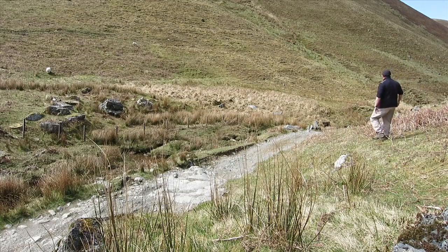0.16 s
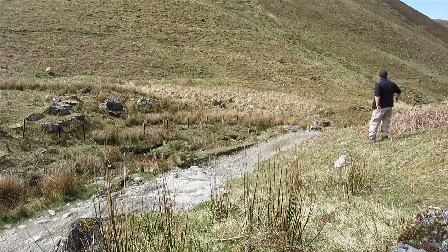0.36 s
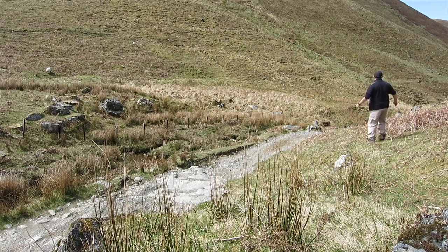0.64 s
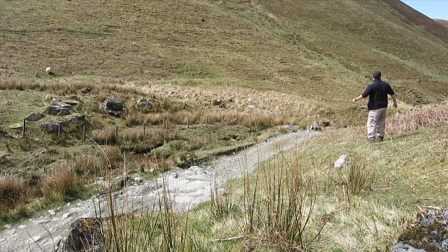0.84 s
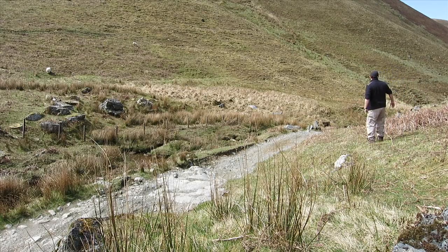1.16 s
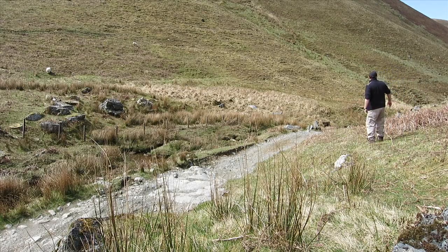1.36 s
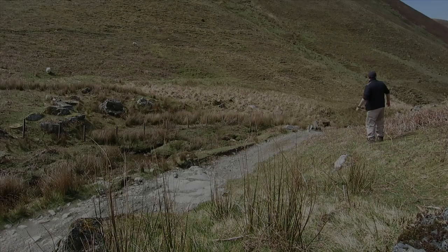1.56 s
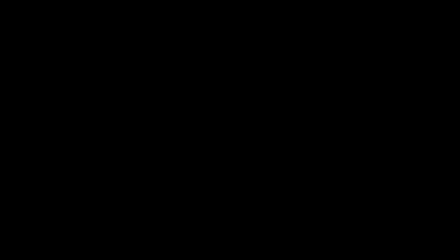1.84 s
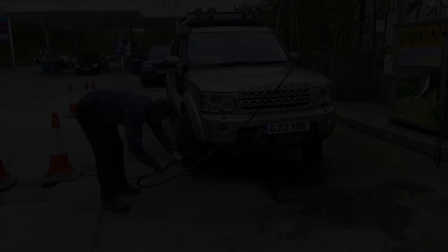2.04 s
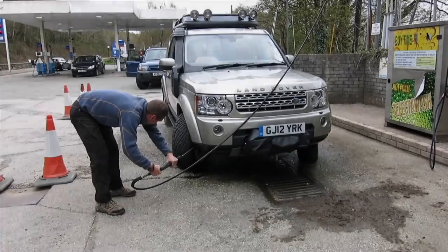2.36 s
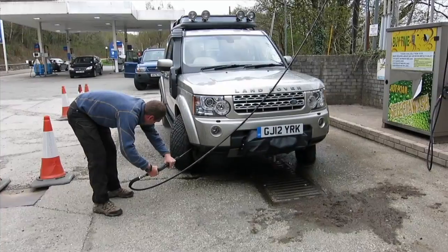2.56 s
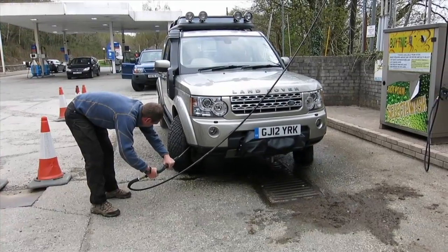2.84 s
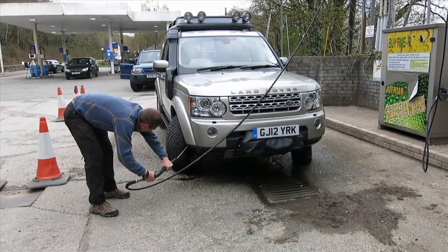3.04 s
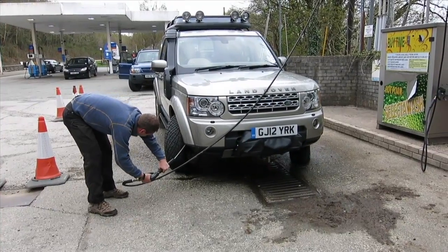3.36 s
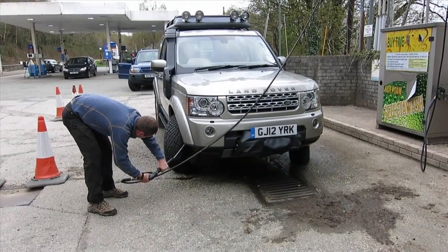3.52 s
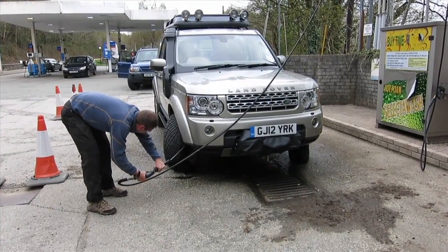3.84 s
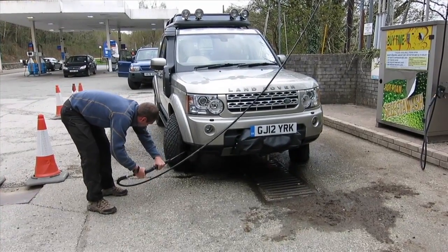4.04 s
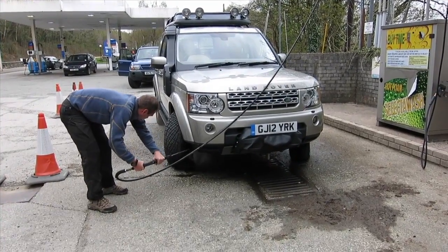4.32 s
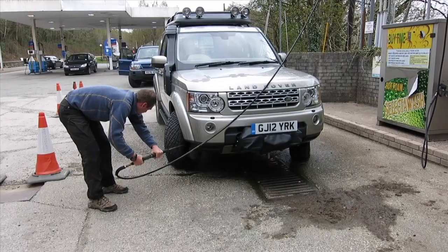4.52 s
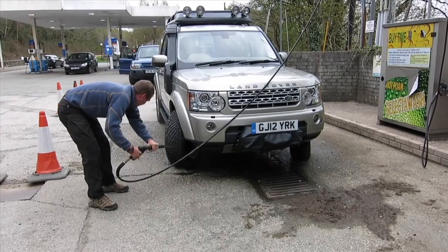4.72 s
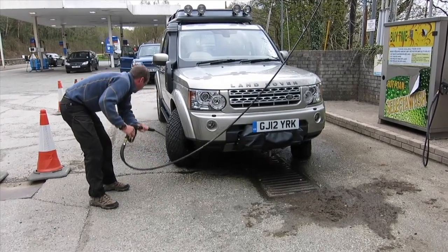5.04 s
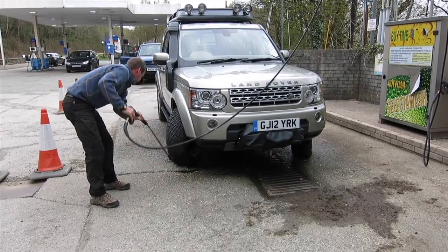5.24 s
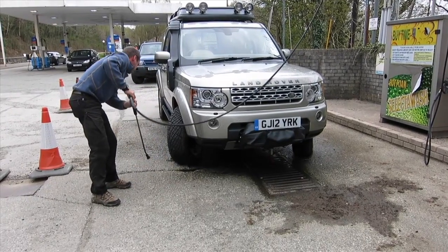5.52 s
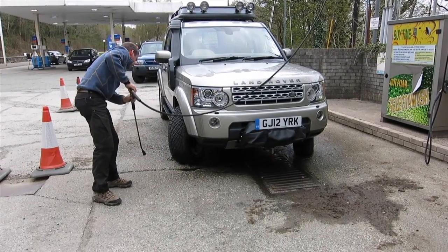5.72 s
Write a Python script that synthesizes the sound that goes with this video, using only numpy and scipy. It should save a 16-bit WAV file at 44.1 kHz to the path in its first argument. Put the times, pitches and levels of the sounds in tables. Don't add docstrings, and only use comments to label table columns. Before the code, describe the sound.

Gusty wind and crisp grass rustle, an abrupt cut to loud hissing water spray, then a humming, squeaking, knocking pump and fine drips.

```python
import sys
import numpy as np
from scipy import signal
from scipy.fft import rfft, irfft, next_fast_len
from scipy.io import wavfile
from scipy.ndimage import uniform_filter1d

SR = 44100
rng = np.random.default_rng(int(sys.argv[2]) if len(sys.argv) > 2 else 0)


def to_linear_factor(level_db):
    exponent = np.asarray(level_db, float) / 20
    return 10 ** exponent


def inscribe(sig):
    pcm = np.round(np.clip(np.atleast_2d(sig).T, -1, 1) * 32767)
    wavfile.write(sys.argv[1], SR, pcm.astype(np.int16))


N = 259749
T = np.arange(N) / SR
SHUT = 4.655


def evened(x):
    return x / np.sqrt(np.mean(x ** 2) + 1e-20)


def read(points, hz):
    f, value = np.transpose(points)
    return np.interp(np.log(hz + 1), np.log(f + 1), value)


def columns(rows):
    s, *rest = np.transpose(rows)
    return [np.interp(T, s, c) for c in rest]


def swells(rows, t, rise, fall, rest_db):
    start, hold, db = np.transpose(rows)[:, :, None]
    rising = rise * np.maximum(start - t, 0)
    falling = fall * np.maximum(t - start - hold, 0)
    each = db - rising - falling
    return np.maximum(each.max(0), rest_db)


def add(mix, s, sound, lean_db, sense=1):
    part = mix[:, max(round(s * SR), 0):][:, :len(sound)]
    lean = to_linear_factor(np.minimum([[lean_db], [-lean_db]], 0))
    part += sound[:part.shape[1]] * lean * [[1], [sense]]


def resonate(x, hz, width):
    turn = np.exp(2j * np.pi * np.cumsum(hz * np.ones(N)) / SR)
    r = np.exp(-np.pi * width / SR)
    return 2 * (turn * signal.lfilter([1 - r], [1, -r], x / turn)).real


def noise(shape, lean, patchy_db, flicker_db, lifts=()):
    # f/Hz, likeness 0-1
    likeness = [(200, 1), (700, 0.97), (1400, 0.91), (2800, 0.94), (3900, 0.97), (6000, 0.99), (10600, 1),
                (11600, 0.83), (13000, 0.74), (15000, 0.8)]
    frames, hz = N // 256 + 5, np.fft.rfftfreq(512, 1 / SR)
    a, b, c, d, patches = rng.standard_normal((frames, 257, 5)).T
    patches = uniform_filter1d(patches, size=6, axis=0)
    patches = evened(uniform_filter1d(patches, size=12, axis=1))
    flicker = evened(uniform_filter1d(rng.standard_normal(frames), size=2))
    apart = np.sqrt(1 - np.clip(read(likeness, hz), -1, 1)[:, None] ** 2) * to_linear_factor(4 * patches[::-1, ::-1])
    apart = np.minimum(apart, 1)
    left = a + 1j * b
    right = np.sqrt(1 - apart ** 2) * left + apart * (c + 1j * d)
    z = np.array([left, right]) * to_linear_factor(patchy_db * patches + flicker_db * flicker)
    x = signal.istft(z, window="cosine", nperseg=512, noverlap=256)[1]
    size = next_fast_len(N)
    fine = np.fft.rfftfreq(size, 1 / SR)
    db = read(shape, fine) + sum(lift / (1 + (2 * (fine - f) / w) ** 2) for f, w, lift in lifts)
    lean_db = read(lean, fine) / 2 * np.array([[1], [-1]])
    x = irfft(rfft(x, size) * to_linear_factor(db + lean_db), size)[:, :N]
    return x / np.sqrt(np.mean(x.mean(0) ** 2))


def hits(rows, t60, spread, trim_db, scatter=1, rise=0.00038):
    out, t = np.zeros((2, N)), np.arange(2500) / SR
    end_fade = signal.windows.tukey(5000, .4)[2500:]
    for (s, db, hz, lean_db), (off, phase) in zip(rows, rng.random((len(rows), 2, 12, 1))):
        partial_hz = hz * np.exp(spread * (2 * off - 1))
        partial_hz = 15000 - abs(15000 - partial_hz)
        partials = np.sin(2 * np.pi * (partial_hz * t + scatter * phase)).sum(0)
        decay = to_linear_factor(db + trim_db - 60 * t / t60)
        hit = partials / np.sqrt(12) * decay * np.minimum(t / rise, 1)
        add(out, s, hit * end_fade, lean_db)
    return out


def tones(lines, waver_db):
    drift = uniform_filter1d(rng.standard_normal((len(lines), N // 100 + 2)), size=30)
    total = 0
    for (hz, db), d in zip(lines, drift):
        waver = np.interp(T * SR / 100, np.arange(len(d)), evened(d))
        total = total + to_linear_factor(db + waver_db * waver) * np.sin(2 * np.pi * (hz * T + rng.random()))
    return evened(total)


def eddy(hz, turns, phase, edge):
    u = np.arange(-700, 700) / SR * hz
    swing = np.cos(2 * np.pi * u + phase) * np.exp(-(u / turns) ** 2)
    core = np.cos(2 * np.pi * 1.97 * u + phase) * np.exp(-(u / 0.3) ** 2)
    return ((1 - edge) * swing + edge * core) * signal.windows.hann(1400)


def wind(spread_db=4.5):
    # start t/s, hold/s, strength level/dB
    squalls = [(0.0, 0.11, -38.5), (.16, 0.074, -50), (.47, 0.097, -34), (.58, 0.18, -27),
               (.96, 0.091, -28.5), (1.085, 0.043, -19), (1.21, 0.042, -38.5), (1.33, 0.04, -31),
               (1.5, 0.11, -43), (1.76, 0.027, -40.5), (1.89, 0.032, -32.5), (2.17, 0.13, -25.5),
               (2.38, 0.19, -49), (2.8, 0.045, -23), (3.07, 0.12, -29), (3.2, 0.084, -23.5),
               (3.32, 0.18, -37), (3.55, 0.25, -49), (5.82, .1, -42)]
    # t/s, peak level/dB, f/Hz, left over right/dB
    hill_gusts = [(0.0129, -18, 119, -1.5), (0.072, -17, 187, 2.5), (0.216, -32, 140, 4.0),
                  (0.47, -20.5, 134, 1), (0.5962, -7, 213, -1.5), (0.637, -4.5, 193, -11),
                  (0.653, -6, 107, -6), (0.67, -3.5, 236, 1), (0.736, -3, 204, 0.5),
                  (0.7445, -11.5, 290, 3), (0.8873, -14, 169.3, 2.3), (0.9185, -13.5, 220.4, 3.5),
                  (0.928, -9, 155, 2.5), (1.0072, -2, 208, 2), (1.057, -11, 266, 3),
                  (1.0954, -1.5, 366, 30), (1.101, -11, 510, 7), (1.105, -2, 343, 9),
                  (1.111, -10.5, 291, 6), (1.246, -20, 100, 1), (1.334, -9, 196, -2.5),
                  (1.3745, -15, 197, 2.3), (1.5018, -18, 136, 3), (1.551, -18, 173, -2),
                  (1.579, -18.5, 168, -3.5), (1.763, -21, 109, 1), (1.8125, -22.5, 193, 7),
                  (1.8794, -17.5, 233, 5), (1.899, -32, 170, 7), (1.992, -16.5, 130, 1.4)]
    # t/s, peak level/dB, f/Hz, left over right/dB
    bay_gusts = [(2.305, -13, 170, -6), (2.333, -13, 168, 6), (2.798, -12, 201, 20), (2.812, -6, 201, -8),
                 (3.1743, -5, 240, 6), (3.2054, -8, 149, 0), (3.2656, -4.5, 172, 1.5), (3.4165, 0, 245, -2),
                 (3.442, -13, 170, 0), (3.701, -23.5, 89.5, -7), (5.818, -30, 95, -8)]
    out = np.zeros((2, N))
    at = np.arange(0, N / SR, 1 / 190)
    squall_db = swells(squalls, at, rise=270, fall=400, rest_db=-62)
    draws = np.c_[rng.random((len(at), 2)), rng.standard_normal((len(at), 3))]
    for t, strength, (u, v, size, pace, lean) in zip(at, squall_db, draws):
        hz = (165 + 1.4 * (strength + 35)) * np.exp(0.36 * pace)
        swirl = to_linear_factor(strength + 2.0 + spread_db * size) * eddy(hz, 1.0, 2 * np.pi * v, 0.19)
        add(out, t + u * 0.00436 - 700 / SR, swirl, 5.3 * lean, -1)
    for t, peak_db, hz, lean_db in hill_gusts + bay_gusts:
        gust = to_linear_factor(peak_db) * rng.choice([-1, 1]) * eddy(hz, 0.49, 0.12, 0.11)
        add(out, t - 700 / SR, gust, lean_db, -1)
    return out


def far_air():
    # f/Hz, level/dB per Hz
    common = [(40, -20), (100, 0.5), (250, 2), (600, -6.5), (1200, -12), (2600, -17.5), (3600, -25),
              (8000, -30.5), (15500, -41)]
    # f/Hz, level/dB per Hz
    opposed = [(40, -16), (120, 3), (300, -4), (700, -9), (1500, -15.5), (2800, -28.5), (4500, -39),
               (15500, -45)]
    flat, fade_db = [(100, 0), (200, 0)], -3.5 * T
    mid = to_linear_factor(-59.5 + fade_db) * noise(common, flat, 2.6, 0.58)[0]
    side = to_linear_factor(-55 + fade_db) * noise(opposed, flat, 1.5, .6)[0]
    return mid + side * [[1], [-1]]


def grass():
    # f/Hz, level/dB per Hz
    stalks = [(3000, -34), (5500, -11), (8000, -9), (12000, -4.5), (14500, -13), (16000, -20)]
    # start t/s, hold/s, level/dB
    slides = [
        (0.0, .05, -78),
        (.132, .008, -66),
        (.19, .015, -63),
        (.255, 0.044, -53.5),
        (.53, 0.021, -67),
        (.572, .02, -71),
        (.81, 0.08, -72),
    ]
    # t/s, peak level/dB, f/Hz, left over right/dB
    snaps = [(0.0243, -42, 10200, 6), (0.1286, -48, 13500, 8), (.133, -48, 8200, 4),
             (0.17, -55, 11500, 5.0), (0.189, -40, 11600, 6), (0.2109, -39, 11800, 7),
             (0.2483, -44, 11900, 2.5), (0.2563, -40, 12200, 2.0), (0.2698, -37, 11800, 7),
             (0.2952, -33, 12000, 5), (.296, -38, 7500, 8), (.311, -46, 10000, 4),
             (0.4469, -50, 11200, 3.0), (0.5312, -35, 11300, 5.0), (.538, -50, 10000, 5),
             (0.5656, -39, 11900, 7.5), (0.7946, -53, 8720, 2.0), (0.851, -38, 7200, 3),
             (0.8919, -56, 6120, 18), (1.0515, -60, 6600, -0.5)]
    slide_db = swells(slides, T, rise=830, fall=440, rest_db=-81 - 9 * T)
    slide = to_linear_factor(slide_db) * noise(stalks, [(100, 3), (200, 5.5)], 2.5, 6.4)
    return slide + hits(snaps, 0.01, 0.3, -2.0)


def port_cracks():
    # t/s, peak level/dB, f/Hz, left over right/dB
    jolts = [
        (.851, -59, 3770, 1),
        (1.005, -55, 2800, 2),
        (1.093, -43, 3260, 14),
        (1.094, -48, 1680, 16),
        (1.65, -64, 4510, 0),
    ]
    return hits(jolts, 0.013, 0.19, 0)


def hillside():
    return far_air() + grass() + port_cracks()


def gain_drop():
    # t/s, drop level/dB
    trips = [
        (2.193, 2.5),
        (2.814, 5),
        (3.21, 4.5),
        (3.416, 7),
    ]
    total_db = 0
    for s, db in trips:
        fall = np.clip((T - s) / 0.0077 + .5, 0, 1)
        recovery = np.exp(-np.maximum(T - s, 0) / 0.54)
        total_db = total_db - db * fall * recovery
    return total_db


def arch_roar(lean, rims):
    # f/Hz, level/dB per Hz
    roaring = [(250, -35), (400, -8), (520, 0.5), (700, -0.5), (850, -1), (1100, -5.5), (1400, -9.5),
               (2500, -66)]
    # t/s, f/Hz, ringing 0-1
    hollows = [(2, 670, 0.55), (2.6, 700, 0.35), (3.1, 700, 0.03), (3.4, 644, 0), (3.5, 840, 0.7),
               (3.61, 830, 0.57), (3.68, 940, 0.96), (3.76, 895, 0.75), (3.83, 950, 0.3), (3.92, 800, 0.4),
               (4.05, 810, .5), (4.65, 766, 1)]
    roar = noise(roaring, lean, 1.02, 1.0, rims)
    hollow_hz, ringing = columns(hollows)
    hollow = evened(resonate(roar, hollow_hz, 117))
    return np.sqrt(1 - np.clip(ringing, 0, .95) ** 2) * roar + ringing * hollow


def lance(hiss_db, splash_db, roar_db, tread_db):
    # f/Hz, level/dB per Hz
    hissing = [(2240, -26), (3800, -7), (4230, -8.5), (5520, -5.5), (6110, -6), (6730, -4.5), (7920, 0),
               (9370, -1.5), (12500, -2), (14600, -4.5), (16000, -17.5)]
    # f/Hz, level/dB per Hz
    splashing = [(1300, -22), (1900, 1), (2400, -1), (3100, 0.5), (3650, -2), (3950, -8), (4600, -9.5),
                 (5500, -7.5), (7000, -20)]
    # f/Hz, level/dB per Hz
    treading = [(700, -78), (1000, -6.5), (1200, -2), (1500, 3.5), (1900, -6), (2300, -31), (3200, -48)]
    # f/Hz, level/dB per Hz
    underside = [(50, -62), (110, -21), (200, 0.5), (330, 0.5), (460, 2.5), (650, -44), (1200, -60)]
    # t/s, level over hiss/dB
    drumming = [
        (2.03, -18.5),
        (2.13, -13),
        (2.7, -13.5),
        (3.3, -16.5),
        (3.7, -21),
        (4.2, -21.5),
        (4.6, -17),
    ]
    # f/Hz, width/Hz, lift/dB
    rims = [(466, 38, 2), (601, 27, 3), (754, 7, 8), (858, 12, 5), (942, 22, 3), (1247, 70, 2.5),
            (1529, 55, 3), (1948, 50, 2.5), (2676, 32, 3.5), (3255, 50, 3), (3478, 70, 2.5),
            (7924, 40, 3.5), (8146, 95, 2.5), (12527, 45, 2.5)]
    # f/Hz, left over right/dB
    jet_lean = [(60, 0), (150, -2), (380, -4.5), (950, -6), (2380, -2.5), (4200, 0), (10000, -1.5),
                (15000, 0)]
    hiss = noise(hissing, jet_lean, 0.99, 0.74, rims)
    splash = to_linear_factor(splash_db) * noise(splashing, jet_lean, 1.34, 0.79, rims)
    tread = to_linear_factor(tread_db) * noise(treading, jet_lean, 1.17, 0.29, rims)
    roar = to_linear_factor(roar_db) * arch_roar(jet_lean, rims)
    drum = to_linear_factor(columns(drumming)[0]) * noise(underside, jet_lean, 2.3, 0.43)
    after = np.maximum(T - SHUT, 0)
    spurt_db = 2.4 * np.exp(-((T - SHUT) / 0.066) ** 2)
    hiss = hiss * to_linear_factor(-1100 * after)
    splash = splash * to_linear_factor(-600 * after + spurt_db)
    low = (tread + roar + drum) * to_linear_factor(-480 * after)
    return to_linear_factor(hiss_db) * (hiss + splash + low)


def pump_hum(level_db):
    # f/Hz, level/dB
    hum_lines = [(102.8, -1.5), (156, -4.5), (210, 2), (231, -4), (314, -6.5)]
    return to_linear_factor(level_db - 5.0) * tones(hum_lines, .5) * to_linear_factor([[-1.7], [1.7]])


def pump_casing(level_db):
    # f/Hz, width/Hz, level/dB
    modes = [(657, 22, 7), (700, 35, 10.5), (800, 47, 10), (876, 15, 11), (1030, 46, -20), (1290, 27, -8),
             (1740, 25, 0.5), (1950, 37, -11), (2600, 30, -14)]
    # f/Hz, level/dB
    whine_lines = [(495.3, -59), (522.2, -56), (597.5, -56.5), (624.5, -54), (699.8, -52.5), (748.3, -53),
                   (802.1, -56), (855.9, -50), (882.9, -45.5), (1012, -57), (1281, -61), (1701, -64),
                   (1740, -62), (1976, -66)]
    strokes = np.diff(np.floor(52.66 * T), prepend=0)
    strokes = strokes * to_linear_factor(0.65 * rng.standard_normal(N))
    drive = 0.29 * evened(strokes) + 0.68 * rng.standard_normal(N) + 0.61 * rng.standard_normal((2, N))
    casing = 0
    for hz, width, db in modes:
        ring = signal.lfilter(*signal.iirpeak(hz, hz / width, SR), drive)
        casing = casing + to_linear_factor(db) * evened(ring)
    whine = to_linear_factor(-3) * tones(whine_lines, 2.6)
    return to_linear_factor(level_db) * (to_linear_factor(-5.5) * evened(casing) + whine) * to_linear_factor([[-3], [3]])


def belt_squeak():
    crank = (6.17 * (T - 4.936)) % 1
    judder = 0.93 + 0.62 * np.cos(2 * np.pi * 6 * crank)
    slip = .08 + np.exp(-(1 - crank) / 0.15) * judder * np.minimum((1 - crank) / 0.019, 1)
    squeak_hz = 4560 + 90 * crank
    tone = np.sin(2 * np.pi * np.cumsum(squeak_hz) / SR)
    rasp = 0.42 * evened(resonate(rng.standard_normal(N), squeak_hz, 60))
    return slip * (tone + rasp)


def yard_wash():
    # f/Hz, level/dB per Hz
    yard = [(40, -32), (90, -17), (160, -6), (240, -7), (372, -13), (873, -13), (1180, -16.5), (1720, -17),
            (2700, -25), (3740, -34), (5500, -32.5), (10000, -38), (14500, -41), (16000, -54)]
    # f/Hz, left over right/dB
    bay_lean = [(60, 4), (150, -4), (380, -5.5), (950, -8), (2380, -7), (4200, -0.5), (10000, 3),
                (15000, 3)]
    return noise(yard, bay_lean, 0.68, 0.92)


def pump_knocks():
    # t/s, peak level/dB, f/Hz, left over right/dB
    knocks = [(4.862, -41, 690, -4), (5.01, -46, 880, -4), (5.163, -44, 875, -5), (5.24, -32, 890, -8),
              (5.279, -45, 860, -5), (5.318, -26.5, 860, -12), (5.47, -38, 860, -9), (5.508, -30, 866, -3),
              (5.544, -24.5, 880, -10), (5.61, -24, 800, -8), (5.709, -21, 953, -4.5),
              (5.7165, -31, 1090, -6), (5.748, -24, 676, -5), (5.778, -27, 880, -8),
              (5.815, -22.5, 800, -5), (5.829, -21, 750, -5), (5.861, -20, 800, -5)]
    # t/s, peak level/dB, f/Hz, left over right/dB
    clinks = [(5.1407, -52, 2440, -3.5), (5.574, -47, 4720, -7), (5.744, -39, 2600, -7),
              (5.762, -46, 2630, -7), (5.776, -35, 2560, -9), (5.792, -45, 2610, -7), (5.81, -48, 2590, -6),
              (5.826, -46, 2600, -6), (5.842, -48, 2600, -6.5), (5.864, -38, 2600, -6),
              (5.874, -41, 4620, -3)]
    return hits(knocks, 0.056, 0.144, -7, 0.3) + hits(clinks, 0.14, 0.0065, -9, .4, 0.0044)


def drips():
    # t/s, peak level/dB, f/Hz, left over right/dB
    pings = [(5.0836, -55, 11400, -1.0), (5.1394, -54, 14400, 1.5), (5.1968, -53, 9240, -0.5),
             (5.411, -53, 10200, -1.0), (5.4388, -52, 9930, 0.0), (5.4637, -50, 14800, 1.0),
             (5.4906, -50, 9140, 0.5), (5.6278, -51, 9570, 1.0), (5.6543, -52, 9740, 0.0),
             (5.8154, -49, 10700, 1.0), (5.8433, -46, 10100, 1.0), (5.8743, -49, 11000, -0.5)]
    at = np.arange(SHUT, N / SR - .02, 1 / 30)
    u, v, w, lean = rng.random((len(at), 4)).T
    peak_db = -71 + 9 * v ** 2 + 7 * (at - SHUT)
    tiny = np.c_[at + .03 * u, peak_db, 9500 + 5500 * np.sqrt(w), 8 * lean - 4]
    return hits(tiny, .035, .012, 0) + hits(pings, .035, .01, -4, 1, .002)


def bay(gain_db):
    # t/s, effort level/dB
    load = [
        (4.74, 1.5),
        (5.05, -3),
        (5.23, -2.5),
        (5.7, 4.5),
        (5.79, 6.5),
        (5.825, 10),
        (5.89, 7),
    ]
    effort_db = columns(load)[0]
    hum = pump_hum(-41 + 0.54 * effort_db)
    casing = pump_casing(-42 + effort_db)
    squeak = to_linear_factor(5.0 + 3.9 * (T - SHUT)) * belt_squeak()
    wash = to_linear_factor(-63 + 0.44 * effort_db) * (to_linear_factor(19.0) * yard_wash() + squeak)
    duck_db = np.where(T < SHUT, gain_db, 0)
    return to_linear_factor(duck_db) * (hum + casing + wash) + pump_knocks() + drips()


def scene():
    # t/s, depth into the arch 0-1, share on the tread level/dB, share on the rim level/dB
    aim = [(2.05, 0.26, -12, 0.5), (2.3, 0.3, -9.5, 0), (2.44, 0.14, -8.5, 0.5), (2.55, 0.37, -8.5, 1.5),
           (2.75, 0.35, -9, 0.5), (2.9, 0.36, -10.5, -0.5), (3.15, 0.46, -6.5, 2), (3.35, 0.91, -8, 0),
           (3.5, 0.82, -1, -0.5), (3.68, 0.75, -5, 1.5), (3.81, 1, -2, 2), (3.95, 0.04, -5, 1),
           (4.08, 0.28, -9.5, 2), (4.2, 0.18, -11, -0.5), (4.33, 0, -12.5, 1.5), (4.45, 0.03, -10, 0),
           (4.57, 0.34, -12.5, -0.5), (4.65, 0.12, -8, 1)]
    change, fade_in = 2.008, 0.048
    depth, tread_db, rim_db = columns(aim)
    gain_db = gain_drop()
    hiss_db = -18.5 + gain_db - depth
    splash_db, roar_db = -4.5 + rim_db, -13.5 + 14 * depth
    jet = lance(hiss_db, splash_db, roar_db, tread_db)
    before = np.clip((change - T) / 0.00085, 0, 1)
    after = np.clip((T - change - .002) / fade_in, 0, 1) ** 1.1
    return before * hillside() + after * (jet + bay(gain_db)) + (before + after) * wind()


def low_pass(x):
    return signal.sosfilt(signal.butter(12, 16210, fs=SR, output="sos"), x)


def record(dry):
    bass_cut = signal.butter(2, 75, "high", fs=SR, output="sos")
    x = signal.sosfilt(bass_cut, dry)
    limited = np.tanh(x * 0.58) / 0.62
    band_edge = signal.firwin(511, 15750, fs=SR)
    return low_pass(signal.oaconvolve(limited, band_edge[None], "same"))


dry = scene()
out = record(dry)
inscribe(out)
```